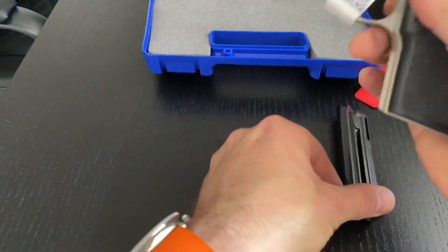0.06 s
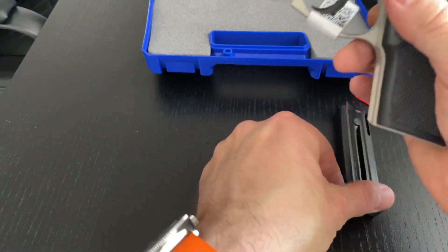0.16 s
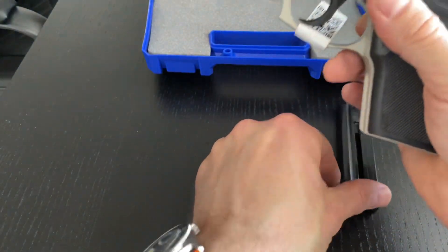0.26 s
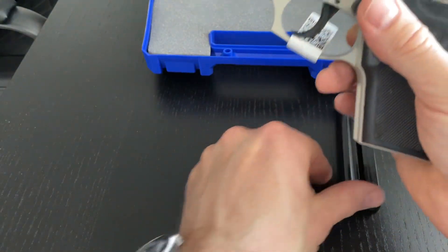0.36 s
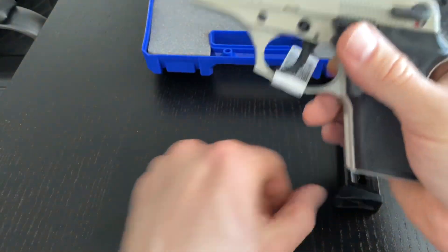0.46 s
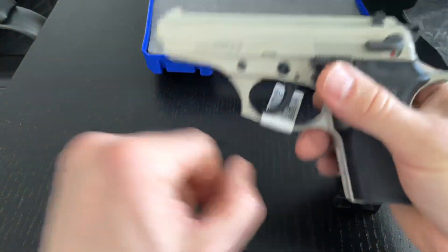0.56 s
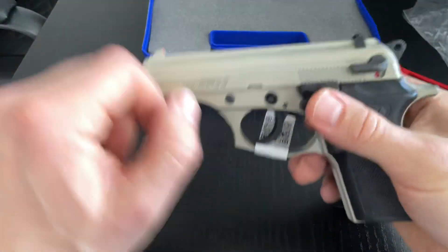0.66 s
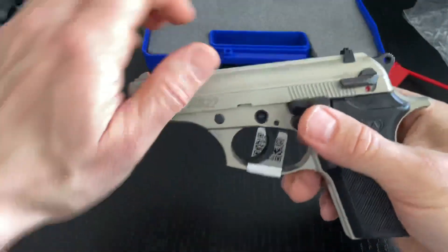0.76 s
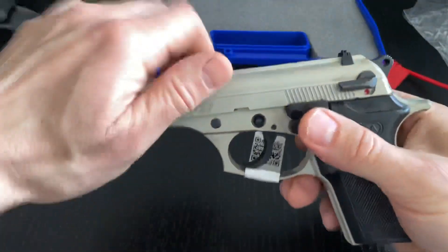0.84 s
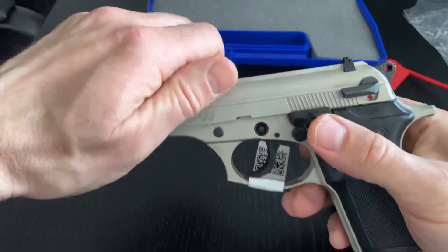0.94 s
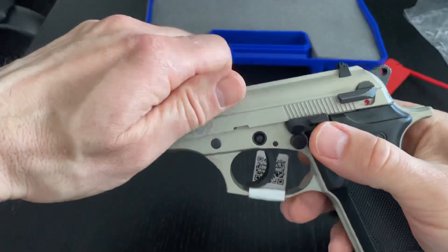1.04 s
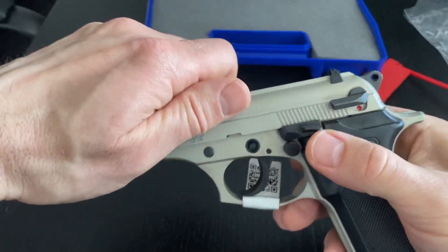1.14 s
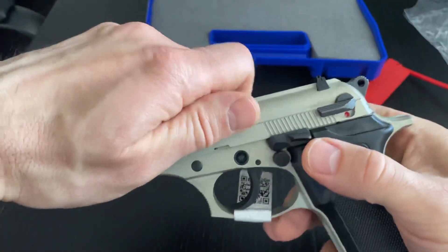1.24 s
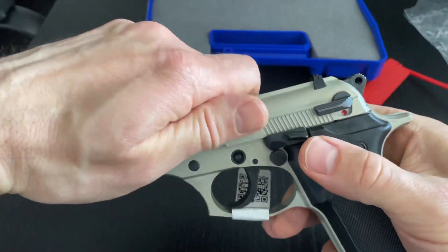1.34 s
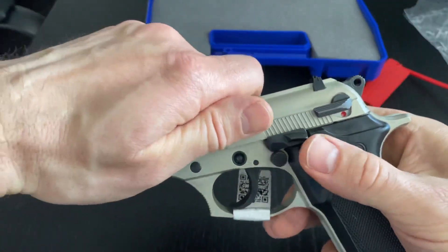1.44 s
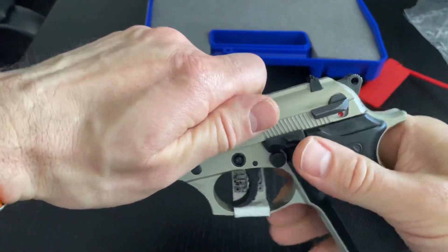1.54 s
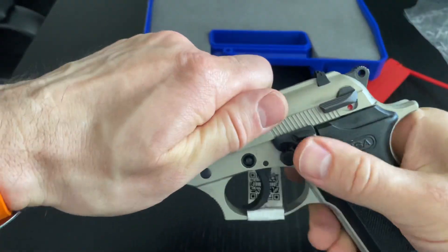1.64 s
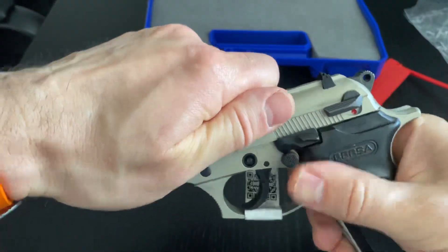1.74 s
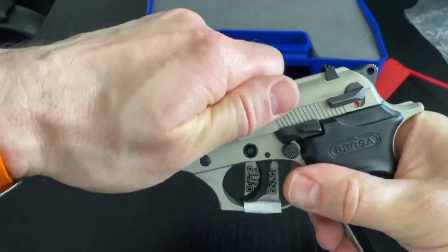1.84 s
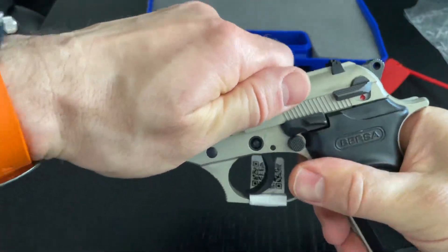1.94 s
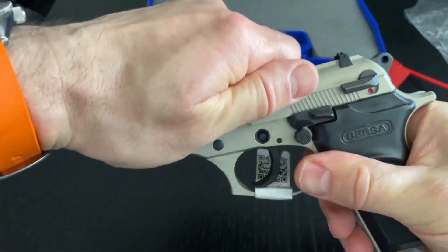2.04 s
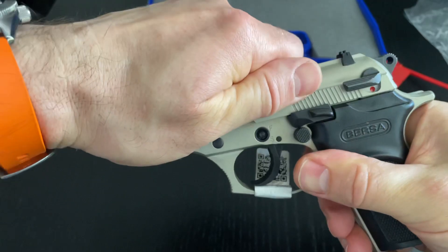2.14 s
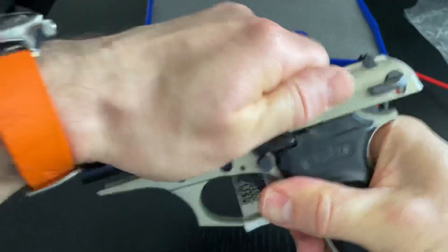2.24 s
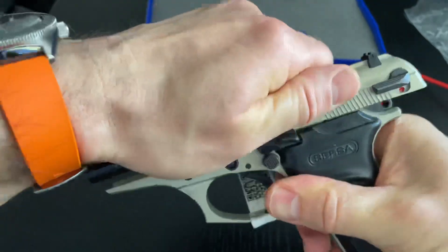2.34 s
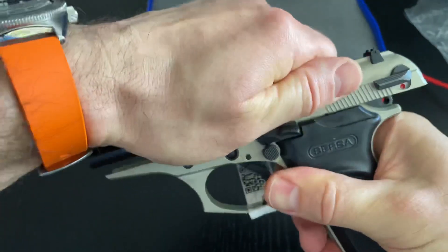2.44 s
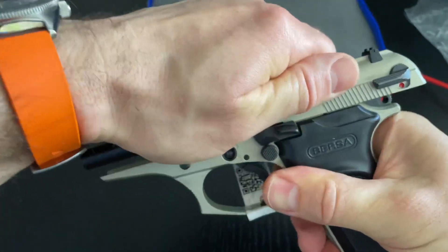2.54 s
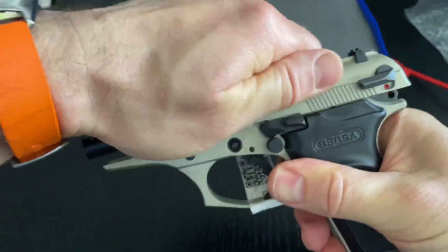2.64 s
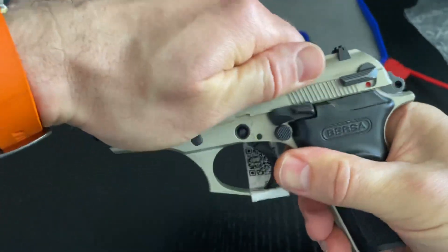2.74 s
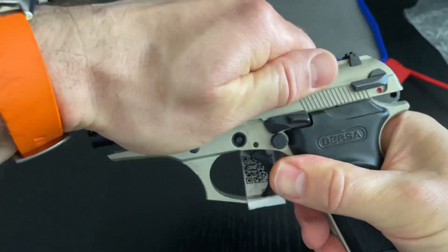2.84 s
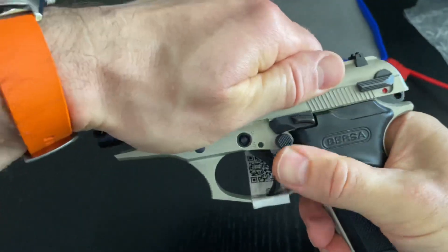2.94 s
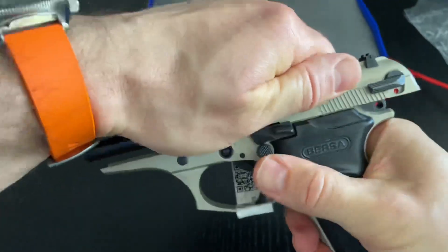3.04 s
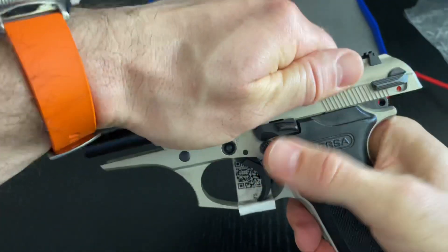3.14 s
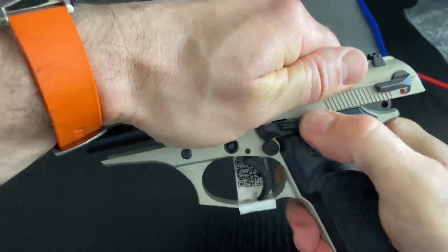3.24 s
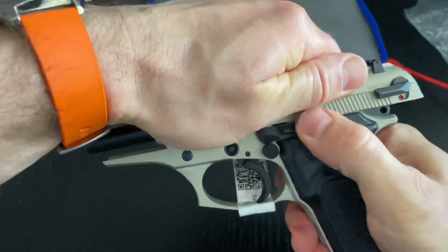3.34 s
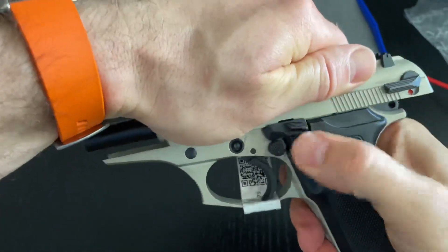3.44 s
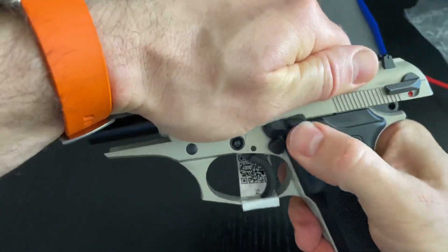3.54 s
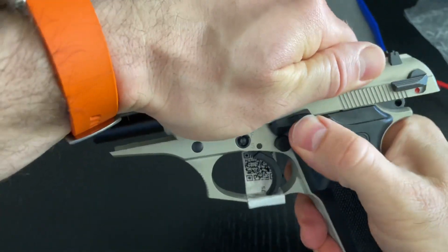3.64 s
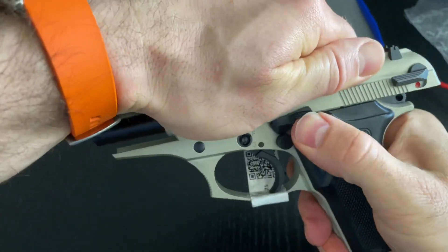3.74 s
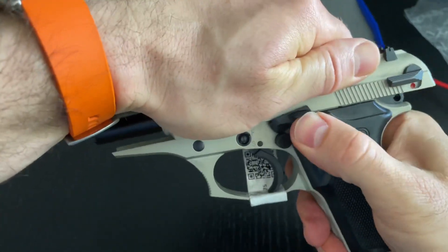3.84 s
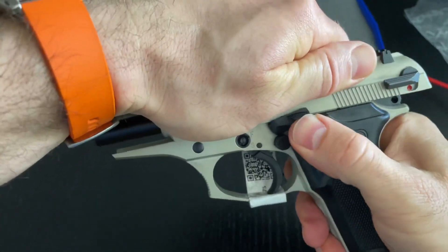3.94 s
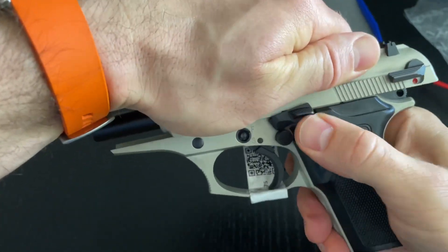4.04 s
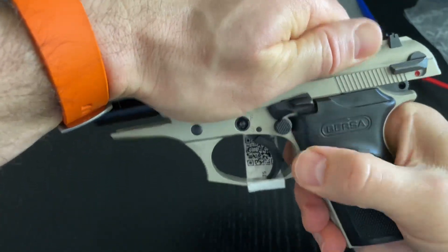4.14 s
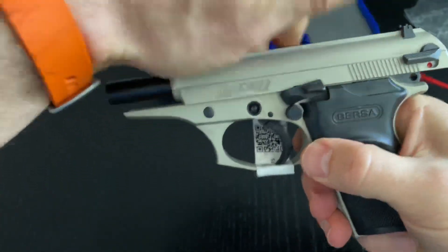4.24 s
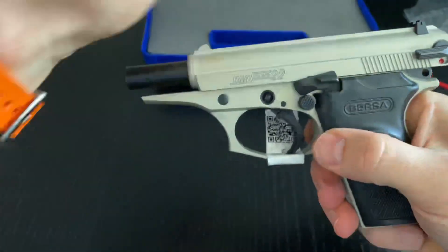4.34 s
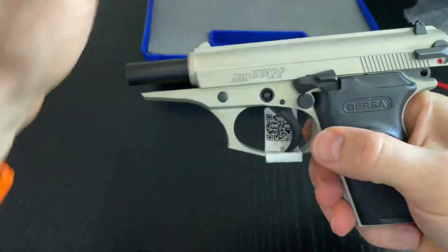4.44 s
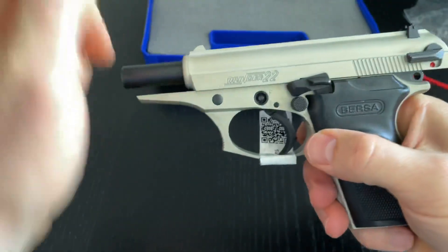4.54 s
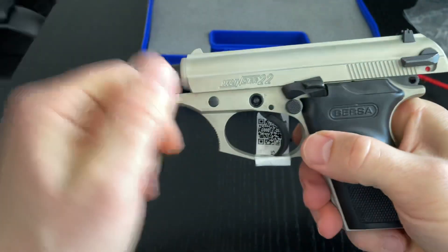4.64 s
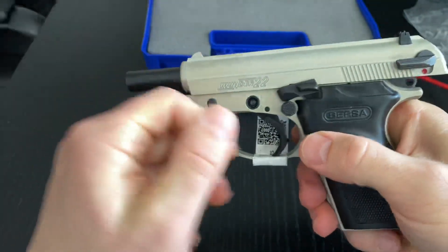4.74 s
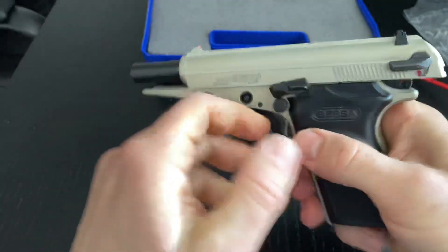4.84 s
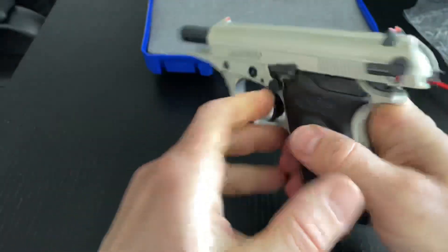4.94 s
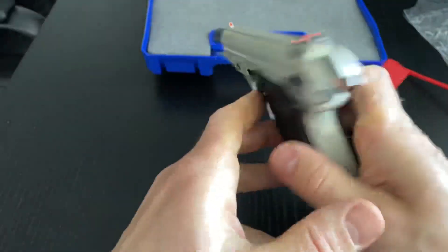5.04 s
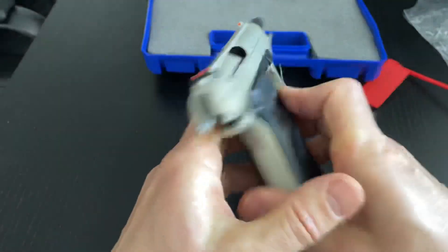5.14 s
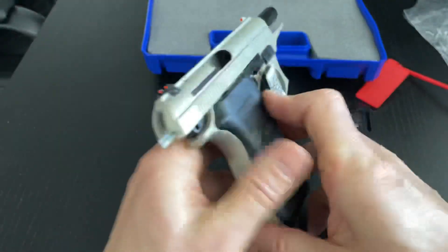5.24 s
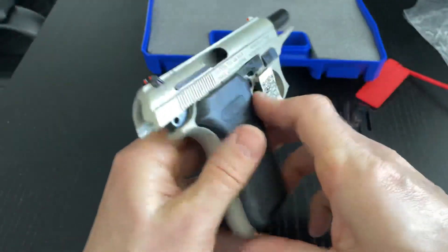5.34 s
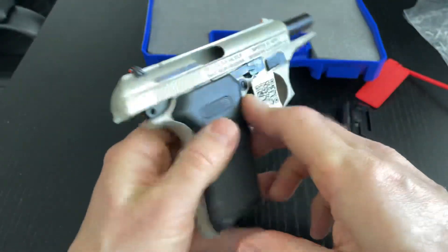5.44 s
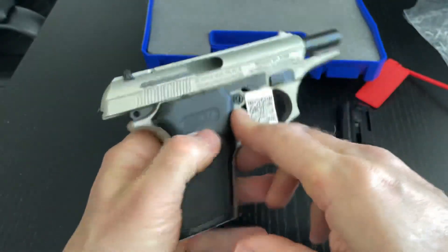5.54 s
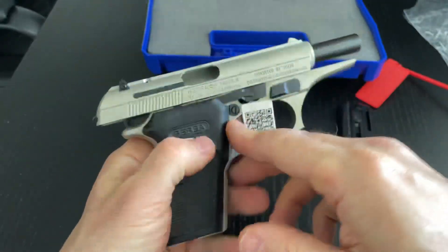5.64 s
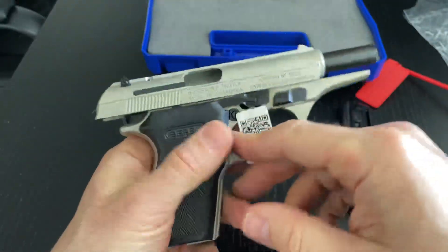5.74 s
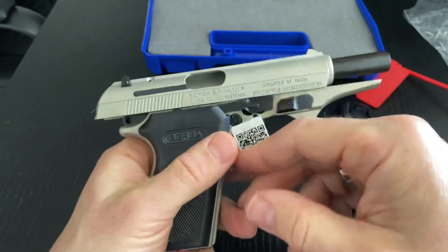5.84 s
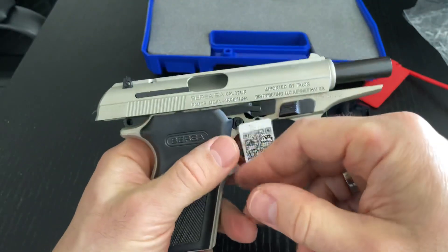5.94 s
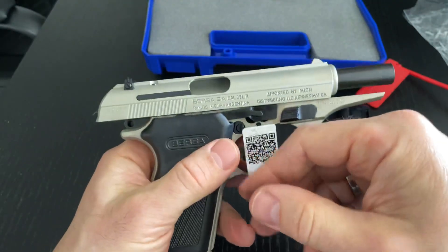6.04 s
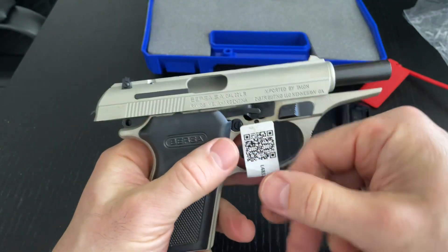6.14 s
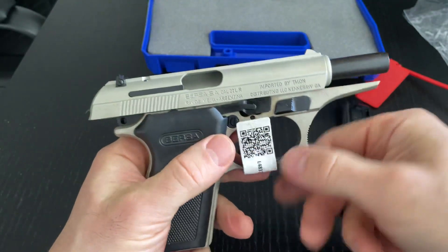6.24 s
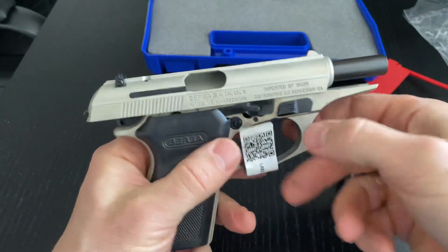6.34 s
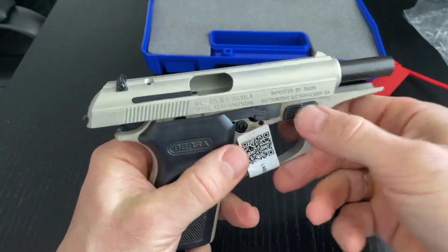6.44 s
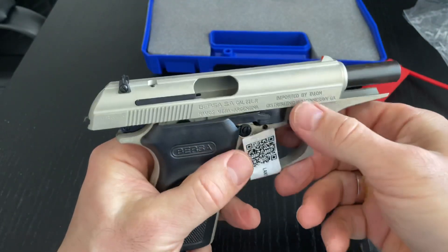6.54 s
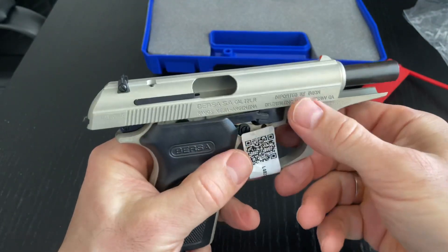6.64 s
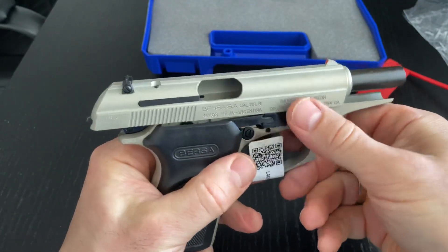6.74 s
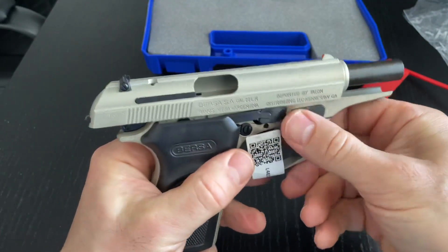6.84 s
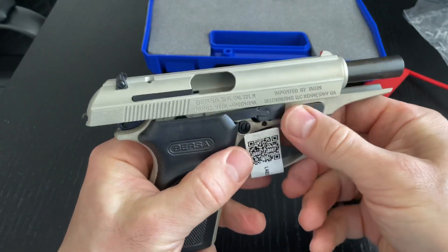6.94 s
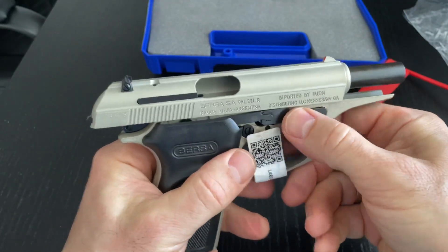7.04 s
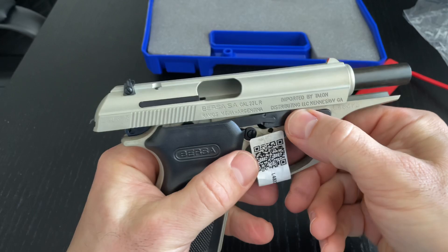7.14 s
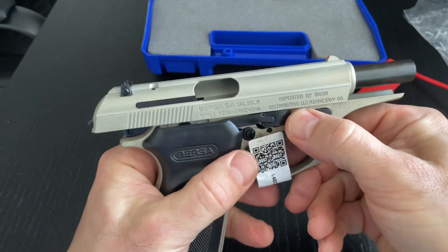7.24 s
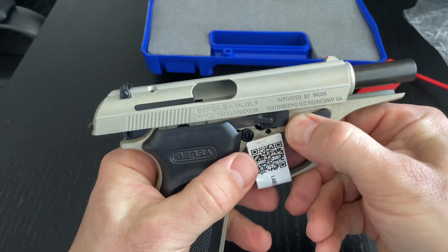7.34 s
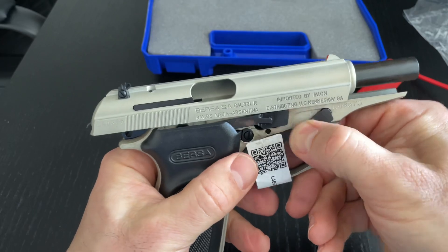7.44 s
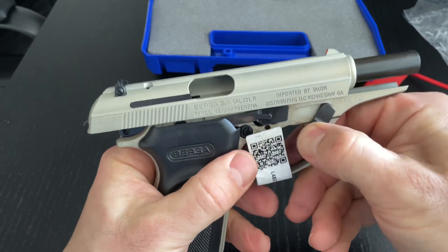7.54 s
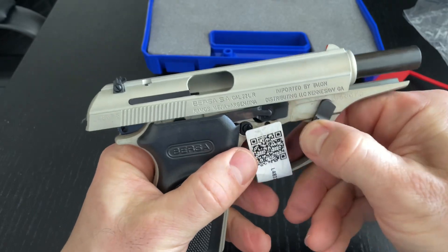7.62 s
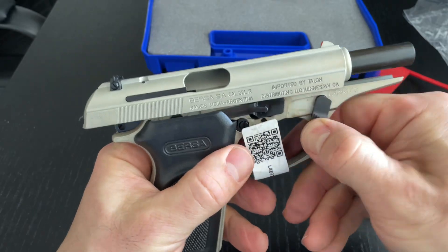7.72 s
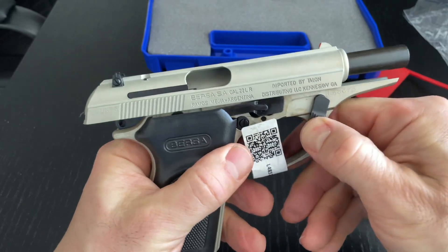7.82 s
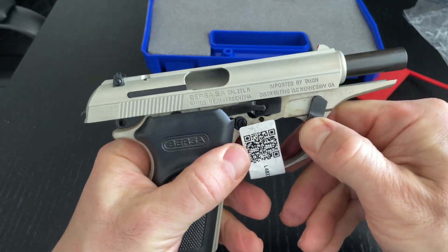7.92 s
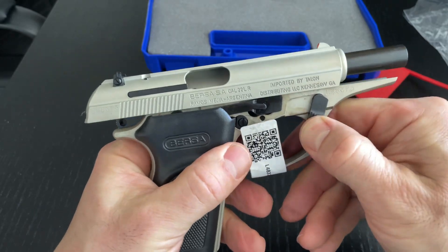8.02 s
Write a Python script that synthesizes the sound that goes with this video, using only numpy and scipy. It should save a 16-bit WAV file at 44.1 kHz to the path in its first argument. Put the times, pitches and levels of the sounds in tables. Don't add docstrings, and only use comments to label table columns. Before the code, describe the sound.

A metal magazine knocks onto a wooden desk, then a pistol slide is racked and locked back with sharp steel clacks, followed by faint handling ticks.

```python
import sys
import numpy as np
from scipy import signal
from scipy.fft import rfft, irfft
from scipy.io import wavfile
from scipy.ndimage import uniform_filter1d

SR = 44100
rng = np.random.default_rng(int(sys.argv[2]) if len(sys.argv) > 2 else 0)


def amplitude_ratio(level_db):
    exponent = np.asarray(level_db, float) / 20
    return 10 ** exponent


def unload_wav(signal):
    wavfile.write(
        sys.argv[1],
        SR,
        np.round(np.clip(np.atleast_2d(signal).T, -1, 1) * 32767).astype(np.int16),
    )


N = 356328

# (frequency [Hz], width [Hz], level [dB])
STEEL_RINGS = [(1043, 130, -4.5), (1120, 90, -6.5), (1645, 490, -14), (1920, 380, -9), (2250, 280, -4.5),
               (2636, 770, -5.5), (3207, 600, -7.5), (3800, 500, -10), (4443, 300, -4), (4650, 170, 0.5),
               (5000, 500, -8.5), (5730, 270, -13.5), (6725, 380, -12.5), (7010, 520, -13.5),
               (9000, 1001, -12), (10000, 1000, -9), (11570, 470, -7), (12900, 370, -18)]


def shape(x, table):
    hz, db = np.transpose(table)
    at = np.log(np.fft.rfftfreq(x.shape[-1], 1 / SR) + 1)
    return irfft(rfft(x) * amplitude_ratio(np.interp(at, np.log(hz + 1), db)), x.shape[-1])


def band(x, lo_hz, hi_hz):
    sos = signal.butter(2, [lo_hz, min(hi_hz, .45 * SR)], "band", fs=SR, output="sos")
    return signal.sosfilt(sos, x)


def unit(x):
    return x / np.sqrt(np.mean(x ** 2))


def peak(x, db):
    return x * amplitude_ratio(db) / np.abs(x).max()


def balance(x, edges, levels):
    signs = (-1, 1, -1)
    return sum(sign * peak(band(x, lo, hi), db - 2.5)
               for lo, hi, db, sign in zip(edges, edges[1:], levels, signs))


def walk(rate):
    k = int(SR / rate)
    steps = np.repeat(rng.standard_normal(N // k + 1), k)
    return 0.69 * uniform_filter1d(steps, k)[:N]


def add(track, s, x, pan_db):
    i = int(s * SR)
    x = x[..., :N - i]
    gain = amplitude_ratio(np.array([[pan_db], [-pan_db]])[:len(track)] / 2)
    track[:, i:i + x.shape[-1]] += x * gain


def ring(modes, scatter_db, size=4096):
    hz, width, db = np.transpose(sorted(modes))[:, :, None]
    luck = rng.standard_normal((2, len(modes), 1))
    t = np.arange(size) / SR
    detuned_hz = hz * (1 + 0.006 * luck[0])
    waves = np.exp(-np.pi * width * t) * np.sin(2 * np.pi * detuned_hz * t)
    sign = (-1) ** np.arange(len(modes))[:, None]
    return np.sum(sign * amplitude_ratio(db + scatter_db * luck[1]) * np.sqrt(width) * waves, axis=0)


def blow(modes, contact_s, crack_db):
    size, rough_share = 4096, .8
    push = rng.standard_normal(size) * np.exp(-np.arange(size) / (contact_s * SR))
    touch_first = rough_share * push / np.sqrt(contact_s * SR / 2)
    touch_first[0] = 1
    body = signal.fftconvolve(touch_first, ring(modes, scatter_db=1.0))[:size]
    return body / np.abs(body).max() + amplitude_ratio(crack_db) * push


def through(push, modes, direct_db):
    body = ring(modes, scatter_db=1.0)
    return signal.fftconvolve(push, body / np.sqrt(np.sum(body ** 2)))[:N] + amplitude_ratio(direct_db) * push


def touch(length):
    attack_share, sag_db, release_db_s = 0.21, -5, 901
    t = np.arange(int((length + .12) * SR)) / SR
    fall_db = sag_db * np.clip(t / length, 0, 1) - release_db_s * np.maximum(t - length, 0)
    return np.clip(t / (attack_share * length), 0, 1) * amplitude_ratio(fall_db)


def duck():
    # (time [s], dip [dB], lasting change [dB])
    dips = [(2.28, -25, 2), (3.02, -2, -10)]
    attack_s, recover_s = .04, 0.19
    t = np.arange(N) / SR
    total_db = 0
    for s, dip_db, lasting_db in dips:
        recovery = np.exp(-np.maximum(t - s, 0) / recover_s)
        total_db = total_db + np.clip((t - s) / attack_s, 0, 1) * (lasting_db + dip_db * recovery)
    return total_db


def air():
    # (frequency [Hz], level [dB per Hz])
    air_colour = [(12, -36), (20, -15.5), (49, 5), (81, 0), (130, -5), (182, -5), (328, -27), (434, -29),
                  (499, -35.5), (780, -38), (1760, -45.5), (4810, -51), (8180, -57.5), (10200, -50),
                  (16000, -65)]
    # (frequency [Hz], correlation [0 to 1])
    likeness = [(30, .97), (60, .92), (125, .72), (250, .75), (1000, .5), (8000, .4)]
    level_db, fan_hz = -52, 172
    mid, side = rng.standard_normal((2, N))
    side = shape(side, [(hz, 10 * np.log10((1 - min(c, .99)) / (1 + c))) for hz, c in likeness])
    rumble = unit(shape(np.array([mid + side, mid - side]), air_colour))
    rumble = rumble * amplitude_ratio(np.array([[-.8], [.8]]))
    fan_phase = 2 * np.pi * np.cumsum(fan_hz + 4.0 * walk(4.3)) / SR
    fan = amplitude_ratio(-15 + 3.0 * walk(5.2)) * np.sin(fan_phase) * amplitude_ratio(np.array([[-2.5], [2.5]]))
    return (rumble + fan) * amplitude_ratio(level_db + duck() + 0.91 * walk(3.5))


def room(x):
    # (frequency [Hz], level [dB])
    tail_bands = [(150, -43.5), (400, -40), (1000, -38.5), (2200, -37.5), (4500, -32), (8000, -35),
                  (12500, -32.5)]
    fall_times = [.4, .5, 0.52, 0.48, 0.47, 0.22, 0.31]
    # (delay [s], level [dB])
    bounces = [(.0025, -14.5), (0.011, -19.5), (.019, -21)]
    t = np.arange(SR) / SR
    tail = 0
    for (hz, db), t60 in zip(tail_bands, fall_times):
        noise = unit(band(rng.standard_normal((2, SR)), hz / 1.3, hz * 1.515))
        tail = tail + amplitude_ratio(db - 60 * t / t60) * noise * np.clip(t / 0.0029, 0, 1) / 8
    for s, db in bounces:
        tail[[0, 1], [int(s * SR), int(s * SR * 1.04)]] += amplitude_ratio(db)
    return signal.fftconvolve(x, tail, axes=1)[:, :N]


def ports(x, colour, phase):
    hz, turn = np.transpose(phase)
    turn = np.interp(np.log(np.fft.rfftfreq(N, 1 / SR) + 1), np.log(hz), turn)
    left = shape(x[0], [(f, db / 2) for f, db in colour])
    right = shape(x[1], [(f, -db / 2) for f, db in colour])
    return np.array([left, irfft(rfft(right) * np.exp(-1j * turn), N)])


def knocks():
    # (time [s], peak [dB], loudest mode [Hz], mids against lows [dB])
    taps = [(0.035, -25, 530, -28), (0.045, -30, 503, -28), (0.097, -37.5, 434, -14),
            (.058, -37, 429.8, -28), (.075, -39, 500, -25), (.126, -22.5, 551, -28.5),
            (.152, -36, 875, -25), (.165, -38, 450, -25), (0.138, -27, 503.4, -30), (.199, -40, 417, -21),
            (0.267, -35.5, 494, -21), (0.278, -14, 1460, 3.5), (.2797, -6, 620.7, -2),
            (.2825, -12.5, 870, -5.5), (.292, -18.5, 498.6, -9), (0.302, -17, 700, -2),
            (.315, -17, 869, -9), (0.326, -16.5, 620, -10.5), (.333, -20, 681, -10.5),
            (.359, -30.5, 870, -18.5), (.397, -33, 833, -13), (.513, -39.5, 420, -31.5),
            (.527, -39, 503, -31)]
    # (frequency [Hz], width [Hz], level [dB])
    wood = [(109.5, 240, -27), (434, 80, -5), (503, 80, -5), (620.8, 110, -3.5), (675, 300, -0.5),
            (730, 210, -4), (867, 49, -3), (1030, 290, -7), (1354.3, 200, -8.5), (1579, 300, -10),
            (1829, 420, -7.5), (2200, 740, -8), (2800, 700, -9.5), (3774, 1000, -18.5)]
    split_hz = (250, 1150, 3000, 14000)
    lands_s, scuff_db, pan_db = .284, -54.5, 0
    rocking_db, rocking_fade_db_s, rocking_bright_db = -20, 269.5, -6
    out, t = np.zeros((2, N)), np.arange(N) / SR
    for s, db, hz, mid_db in taps:
        x = blow(wood + [(hz, 0.08 * hz, 5)], contact_s=0.0015, crack_db=-13.5)
        high_db = -3 - 8 * (s > lands_s)
        levels = (db, db + mid_db, db + mid_db + high_db)
        add(out, s, balance(x, split_hz, levels), pan_db)

    boom = blow([(97.5, 24, -2.5), (195, 90, 0.5), (320, 76, 2)], contact_s=0.0037, crack_db=-69.5)
    add(out, lands_s, peak(boom, -25), 0)

    rattle = through(rng.standard_normal(N) * amplitude_ratio(4.0 * walk(250)), wood, direct_db=-6)
    bright = unit(band(rattle, split_hz[1], 5700)) * amplitude_ratio(rocking_bright_db)
    rattle = unit(band(rattle, 480, 1400)) - bright
    fading_db = rocking_db - rocking_fade_db_s * (t - lands_s)
    level = amplitude_ratio(np.where(t < lands_s, scuff_db, fading_db))
    return out + rattle * level * amplitude_ratio(pan_db * np.array([[.5], [-.5]]))


def rub():
    # (frequency [Hz], level [dB per Hz])
    skin = [(350, -39.5), (600, -8), (1030, -3.5), (1560, -6.5), (3550, -2.5), (5300, 0), (8410, -12.5),
            (10300, -7), (13100, -11), (15000, -34)]
    # (start [s], length [s], level [dB], dull part [dB])
    grips = [(.02, 0.059, -65, -6.5), (.13, 0.15, -61.5, -8), (.58, 0.16, -63.5, -3.5),
             (.82, 0.064, -61.5, -5.5), (.885, 0.056, -61, -3.5), (.962, 0.014, -56, -8),
             (.99, 0.26, -76, -16), (1.16, 0.029, -57, -19.5), (1.2, 0.15, -72.5, -28),
             (1.334, 0.043, -70.5, 0), (1.44, 0.044, -62.5, -1.5), (1.48, 0.08, -56.5, -4.5),
             (1.70, 0.07, -62, -10.5), (1.815, 0.023, -66.5, -3.5), (1.93, 0.018, -61, -2.5),
             (2.046, 0.05, -52, 8), (2.42, 0.16, -58.5, -5), (3.12, 0.074, -54, 2.5), (3.19, 0.14, -67, -5),
             (3.38, 0.023, -60.5, -8), (3.485, 0.017, -76.5, 0), (3.53, 0.043, -71, -12),
             (3.708, 0.026, -84.5, -19.5), (4.06, 0.034, -67, -4), (4.115, 0.1, -73.5, 5.5)]
    # (start [s], length [s], level [dB], dull part [dB])
    turns = [(4.53, 0.22, -91, -13), (4.645, 0.04, -72.5, -10), (4.82, 0.056, -60.5, -8),
             (4.9, 0.075, -70, -9), (4.97, 0.26, -74, -17), (5.33, 0.1, -74, -10), (5.51, 0.13, -72, -9),
             (5.63, 0.079, -69.5, -7), (5.76, 0.049, -70.5, -2), (5.84, 0.11, -80.5, -1.5),
             (5.945, 0.017, -78, -18), (6.07, 0.035, -75, -21.5), (6.166, .025, -75, -15.5),
             (6.258, 0.026, -70, -24), (6.366, 0.025, -71, -7), (6.47, 0.026, -80, -20.5),
             (6.7, 0.03, -73, -8.5), (6.775, 0.047, -75.5, -13.5), (7.015, 0.062, -71, -12),
             (7.33, .03, -85, -15.5), (7.42, 0.079, -82.5, -2), (7.6, .06, -84, 0.5),
             (7.698, 0.055, -68, -6)]
    # (start [s], length [s], frequency [Hz], level [dB])
    catches = [(1.059, 0.043, 1000, -79), (1.164, 0.024, 4000, -58), (1.337, 0.017, 5940, -65.5),
               (1.485, .03, 2700, -57.5), (1.512, 0.029, 3050, -54), (1.525, .045, 3330, -66),
               (1.73, .05, 4700, -69.5), (1.84, .05, 3780, -64), (1.881, 0.052, 1980, -65),
               (6.77, .06, 12300, -77), (6.71, 0.049, 9400, -78), (1.5, 0.045, 5000, -58.5),
               (1.558, 0.077, 1452, -65), (4.551, 0.14, 4405, -86.5), (4.549, 0.084, 5440, -87.5),
               (5.001, 0.17, 5000, -84.5), (5.551, 0.11, 5500, -92), (6.082, 0.029, 4000, -75),
               (6.27, .02, 4130, -78), (0.598, 0.12, 423, -63), (3.823, 0.045, 4716, -65.5),
               (3.83, 0.067, 2710, -70.5), (4.12, 0.094, 1490, -75), (4.125, .08, 620, -75),
               (3.865, 0.046, 620, -72), (3.39, .02, 1050, -71), (4.13, 0.034, 3800, -72),
               (4.83, 0.069, 1050, -77), (4.842, 0.083, 1890, -82), (5.098, 0.096, 2300, -83),
               (5.779, .04, 845, -79), (5.662, .04, 844, -81), (6.736, .015, 1047, -80),
               (6.769, 0.043, 2910, -80), (6.775, 0.038, 6030, -79), (7.58, 0.092, 3245, -83.5),
               (7.7, 0.049, 1900, -83)]
    grain = rng.standard_normal((2, N)) * amplitude_ratio(4.5 * walk(600) + 3.5 * walk(60))
    hiss = shape(grain[0] + 1.5 * grain[1] * np.array([[1], [-1]]), skin)
    bright = 0
    for k in range(5):
        part = band(hiss, 1700 * 1.6 ** k, 2720 * 1.6 ** k)
        bright = bright + (-1) ** k * part * amplitude_ratio(1.9 * k + 3.5 * walk(25))
    bright = unit(bright)
    dull = unit(band(hiss, 470, 2300))

    high, low, sing = np.zeros((1, N)), np.zeros((1, N)), np.zeros((2, N))
    for s, length, db, dull_db in list(grips) + list(turns):
        add(high, s, touch(length) * amplitude_ratio(db), 0)
        add(low, s, touch(length) * amplitude_ratio(db + dull_db), 0)
    for s, length, hz, db in catches:
        env = touch(length)
        piece = hiss[:, int(s * SR):][:, :len(env)]
        add(sing, s, env * amplitude_ratio(db) * unit(band(piece, .9 * hz, 1.1 * hz)), 0)
    return high * bright * amplitude_ratio(-0.5) + low * dull + sing


def creep():
    # (frequency [Hz], width [Hz], level [dB])
    whistle = [(585, 600, 2.5), (1475, 460, -2.5), (2120, 310, -4.5), (2980, 180, -8), (3740, 260, -6.5),
               (5000, 2700, -14.5)]
    start_s, length_s, level_db = 1.48, .55, -66
    sing = 0
    for hz, width, band_db in whistle:
        noise = band(rng.standard_normal((2, N)), hz - width / 2, hz + width / 2)
        sing = sing + amplitude_ratio(band_db + 7 * walk(25)) * unit(noise)
    env = np.zeros((1, N))
    add(env, start_s, touch(length_s), 0)
    return sing * amplitude_ratio(level_db) * env


def strokes():
    # (time [s], tool marks crossed per second [Hz], pressure [dB])
    slide_moves = [
        [(1.16, 1120, -73.5), (1.175, 1145, -66.5), (1.225, 1090, -85)],
        [(2.19, 881.8, -69.5), (2.203, 1290, -43.5), (2.215, 2285, -32.5), (2.226, 2380, -36),
         (2.234, 2600, -40), (2.24, 4500, -36), (2.25, 2308, -41.5), (2.263, 2200, -29), (2.27, 1100, -50.5)],
        [(2.58, 1050, -62), (2.588, 1125, -51.5), (2.597, 1056, -48.5), (2.606, 1143, -38), (2.62, 1501, -42.5),
         (2.647, 2200, -39), (2.652, 1507, -44), (2.666, 1656, -36), (2.682, 2200, -42.5), (2.696, 2146, -42),
         (2.708, 1530, -46), (2.72, 1120, -48.5), (2.74, 1011, -56.5)],
        [(2.775, 949.2, -56.5), (2.786, 1120, -41.5), (2.794, 1600, -46.5), (2.803, 2150, -38.5),
         (2.811, 2395, -36), (2.82, 2306, -47)],
        [(2.95, 900, -57.5), (2.962, 1120, -40), (2.967, 2154, -38.5), (2.974, 2250, -39.5),
         (2.9755, 4191, -39.5), (2.981, 4782, -32.5), (2.988, 4600, -39), (2.996, 4600, -37),
         (3.0, 4505, -44.5)],
        [(3.825, 877, -98), (3.85, 1044, -56.5), (3.872, 1033, -64.5), (3.9, 1041, -76), (3.94, 1080, -88)],
        [(6.77, 1050, -86.5), (6.795, 1067, -87), (6.83, 1064, -101)],
    ]
    # (at start [dB], at end [dB])
    grit_share = [(-11, -15), (-5.5, 13.5), (-4, -7), (-15, -4.5), (-20.5, 17.5), (5, -30), (-12, -18.5)]
    # (frequency [Hz], width [Hz], level [dB])
    rails = [(1100, 99, 0), (1550, 580, -7.5), (2280, 238, 0.5), (2800, 540, -1), (4600, 1100, 6.5)]
    chatter_db, grit_scatter_db = 5.5, 4.5
    t = np.arange(N) / SR
    s, hz, chirp_db = np.transpose(sum(slide_moves, []))
    ends = [rows[k][0] for rows in slide_moves for k in (0, -1)]
    grit_db = chirp_db + np.interp(s, ends, np.ravel(grit_share))
    moving = sum(np.clip(np.minimum(t - rows[0][0], rows[-1][0] - t) / 0.0024, 0, 1)
                 for rows in slide_moves)

    wobble = .07 * walk(700) + .04 * walk(150)
    phase = 2 * np.pi * np.cumsum(np.interp(t, s, hz) * (1 + wobble)) / SR
    chirp = (np.sin(phase) + amplitude_ratio(-17.5) * np.sin(2 * phase)) * amplitude_ratio(chatter_db * walk(260))
    rasp = unit(band(rng.standard_normal(N), 1350, 2700)) * amplitude_ratio(-4.5)
    rasp = rasp + unit(band(rng.standard_normal(N), 980, 1250)) * amplitude_ratio(-14)
    ripple = (chirp + rasp) * amplitude_ratio(np.interp(t, s, chirp_db)) * moving

    grit_level = amplitude_ratio(np.interp(t, s, grit_db) + grit_scatter_db * walk(900))
    grit = rng.standard_normal(N) * grit_level * moving
    grit = band(band(grit, 800, 13300), 500, 13300)
    return through(ripple, rails, direct_db=-15) + through(grit, STEEL_RINGS, direct_db=-6)


def clicks():
    # (time [s], peak [dB], strongest ring [Hz], highs [dB], share of that ring [dB])
    strikes = [(2.0577, -33, 1000, 2, 5), (2.0768, -19, 2390, 0.5, 3.5), (2.2082, -17.5, 2200, 4, -17.5),
               (2.2207, -21, 2300, -12.5, -21.5), (2.2455, -12, 11660, 10, 14),
               (2.2528, -21, 2010, -5.5, 5), (2.2605, -19, 2200, -4, 10), (2.2578, -19, 4540, -8.5, -0.5),
               (2.2609, -9, 4690, -6.5, 4), (2.2638, -12, 4470, -6.5, 1), (2.2644, -22.5, 1120, -12.5, 5.5),
               (2.2661, -20, 4600, -8.5, 1), (2.6474, -24, 2250, -12, 10.5), (2.6799, -27, 1036, -11, 6.5),
               (2.8126, -15.5, 4770, 1.5, 1), (2.814, -21.5, 5720, -1.5, 1.5),
               (2.9762, -26, 1100, -10.5, 3), (2.992, -19.5, 2297, -6, 10), (2.992, -7, 4620, -2, 1.5),
               (2.9934, -9.5, 4600, -5, 1), (2.9954, -10, 4650, -5, 1), (3.5681, -27.5, 2840, -24, 16.5),
               (3.577, -44, 2950, -25, 12), (3.589, -50, 2700, -25, 12), (3.847, -55, 1100, -12.5, -11),
               (3.8568, -35.5, 1042, -39, 10.5), (3.8565, -33, 2800, -31, 19)]
    # (time [s], peak [dB], strongest ring [Hz], lows [dB], highs [dB])
    ticks = [(0.5323, -59, 835, -3.5, -26.5), (0.8993, -45.5, 5200, -23, -24.5), (0.967, -65, 960, 2, -7),
             (1.0757, -68, 1020, 22, -10), (1.1629, -44, 3910, -9.5, -1), (1.232, -63, 1068, 6, -17),
             (1.3463, -62.5, 900, 8, -5), (1.4426, -45, 3820, -20, -22), (1.467, -60, 1150, 1, -20),
             (2.563, -67.5, 4520, -20, 6), (2.575, -61, 4500, -23, 7), (2.581, -58, 4500, -20, 8),
             (2.941, -58.5, 4505, -21, 6.5), (3.3865, -57, 3490, -15.5, -12.5),
             (3.3926, -51.5, 5600, -28, -17.5), (3.488, -47, 2290, -21, -28.5),
             (3.7137, -59, 4260, -29, -2), (4.01, -69, 2897, -20, -19.5), (4.07, -63.5, 2490, -9, -13),
             (4.134, -70, 5200, -15, 0), (4.172, -72, 1500, 0, -3), (4.1948, -65.5, 2990, 1, 11),
             (4.227, -78, 958, -1, 20), (4.83, -57.5, 3520, -17.5, -14.5), (4.846, -62, 3490, -12, -8),
             (4.866, -62, 4500, -10, -6), (4.9376, -62.5, 4530, -15, -6), (5.7694, -67, 5455, -10, -8),
             (5.944, -56, 4030, -8, 7), (6.0704, -67.5, 4166, -14.5, -3.5), (6.1713, -68, 4073, -14.5, -4),
             (6.259, -68, 3940, -13, -4), (6.3783, -65, 4040, -14, 7), (6.7067, -61, 828, -0.5, -3),
             (6.7078, -64, 12100, -20, 24), (6.738, -76, 9000, -15.5, 9), (6.7992, -74.5, 1034, 3, 5.5),
             (7.429, -75, 808, -11.5, -13), (7.6026, -77.5, 3220, -15.5, -10),
             (7.7062, -61.5, 3420, -9.5, 3), (8.0001, -80, 7570, -14, 3)]
    split_hz = (820, 1500, 6000, 15000)
    bright_low_db, barrel_low_db = -18.5, -1.5
    hits = []
    for s, db, hz, high_db, part_db in strikes:
        low_db = barrel_low_db if hz < split_hz[1] else bright_low_db
        hits.append((s, db, hz, low_db, high_db, part_db))
    for s, db, hz, low_db, high_db in ticks:
        hits.append((s, db, hz, low_db, high_db, 3.5))

    out = np.zeros((2, N))
    for s, db, hz, low_db, high_db, part_db in hits:
        x = blow(STEEL_RINGS + [(hz, 0.11 * hz, part_db + 4)], contact_s=0.0006, crack_db=-10)
        add(out, s, balance(x, split_hz, (db + low_db, db, db + high_db)), 0)
    for s, db in ((2.266, -30.5), (2.994, -35.5), (3.86, -54)):
        thud = blow([(280.1, 380, 0), (595, 370, -4)], contact_s=0.0051, crack_db=-52.5)
        add(out, s, peak(thud, db), 0)
    return out


def scene():
    # (frequency [Hz], left minus right [dB])
    pistol_colour = [(60, 1.5), (110, -0.5), (200, -2), (380, 3), (700, 5.5), (1290, 1.5), (2380, -0.5),
                     (4400, 4), (8120, -2), (15000, 0)]
    # (frequency [Hz], left leads by [radians])
    pistol_phase = [(400, .3), (1100, -1.7), (2200, 1.6), (4500, 1.5), (8000, 1.0), (12000, 1.6)]
    # (frequency [Hz], left minus right [dB])
    magazine_colour = [(60, -0.5), (110, -1.5), (200, -2), (380, 0.0), (700, 2), (1290, -0.5), (2380, 1.5),
                       (4400, 3), (8120, 0), (15000, 0.0)]
    # (frequency [Hz], left leads by [radians])
    magazine_phase = [(250, .4), (500, 1.0), (850, .6), (1500, 1.7), (12000, 1.5)]
    pistol = ports(clicks() + strokes(), pistol_colour, pistol_phase)
    magazine = ports(knocks(), magazine_colour, magazine_phase)
    near = pistol + magazine + rub() + creep()
    tail_gain = amplitude_ratio(0.35 * duck())
    return near + room(near) * tail_gain + air()


def roll_off(x):
    return signal.sosfilt(signal.butter(12, 16650, fs=SR, output="sos"), x)


def record(dry):
    # (frequency [Hz], level [dB])
    mic_colour = [(20, -8), (45, 0), (12800, 0), (14000, -6), (15900, -7), (16300, -30), (16800, -60)]
    mix = np.tanh(0.92 * shape(dry, mic_colour)) / 0.77
    return roll_off(mix)


dry = scene()
out = record(dry)
unload_wav(out)
```